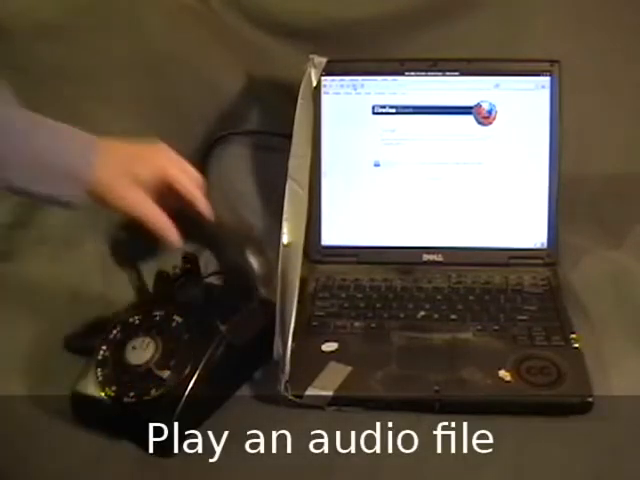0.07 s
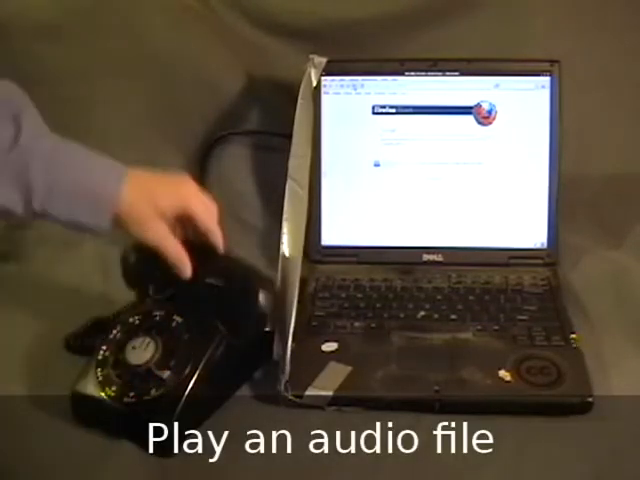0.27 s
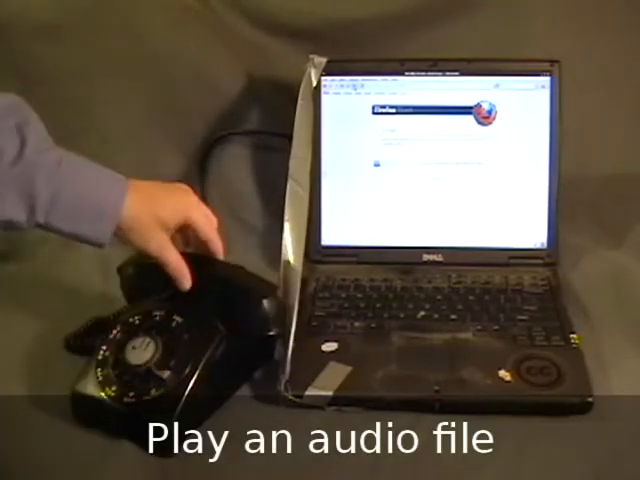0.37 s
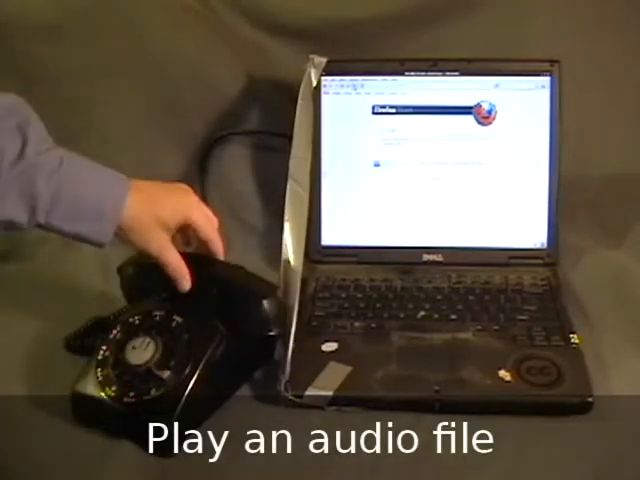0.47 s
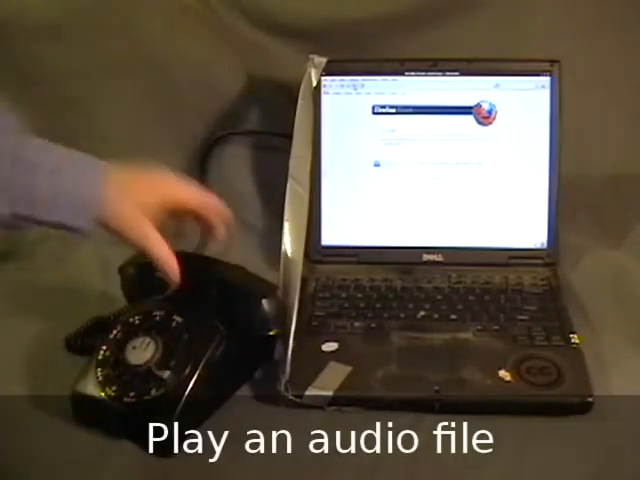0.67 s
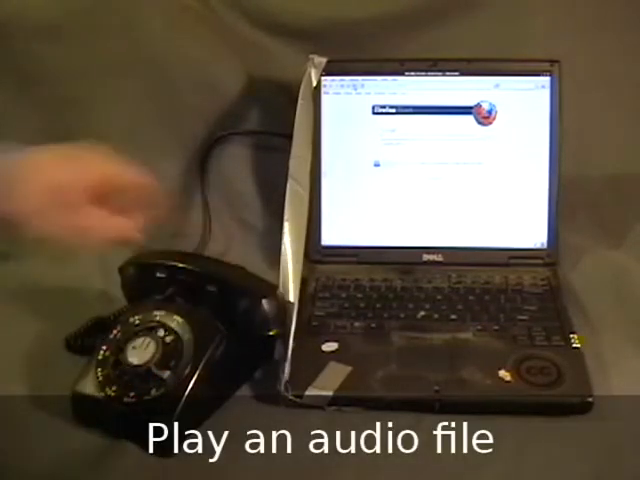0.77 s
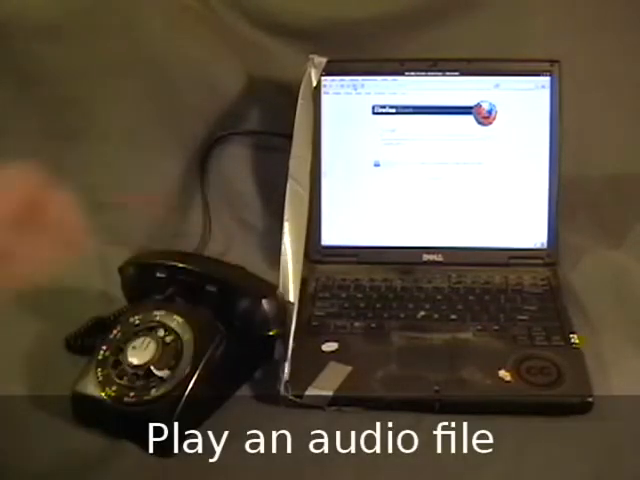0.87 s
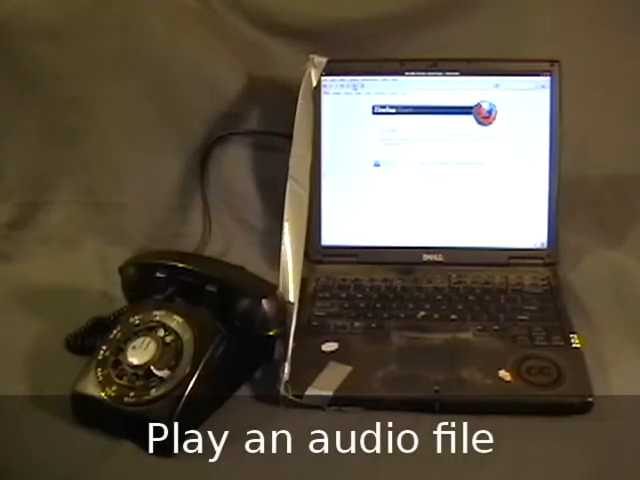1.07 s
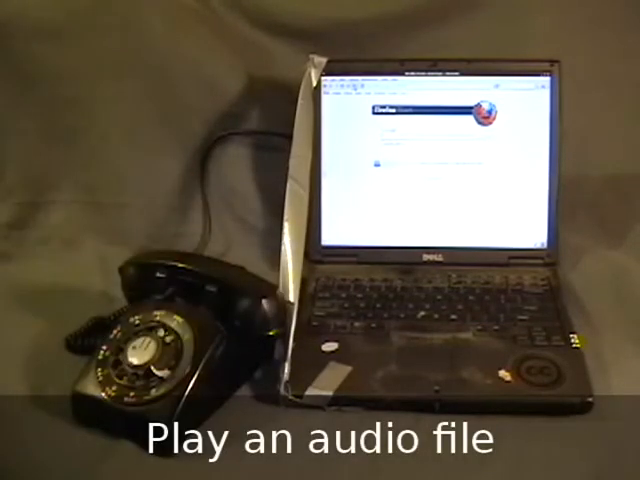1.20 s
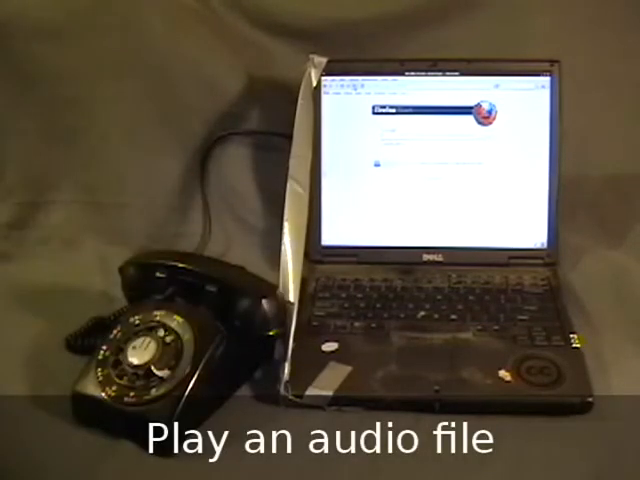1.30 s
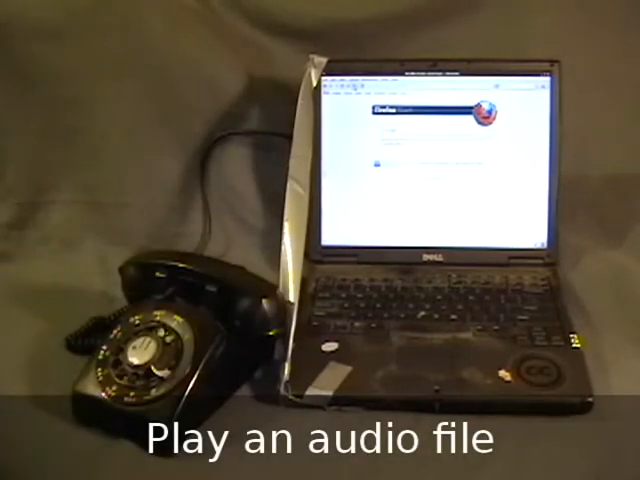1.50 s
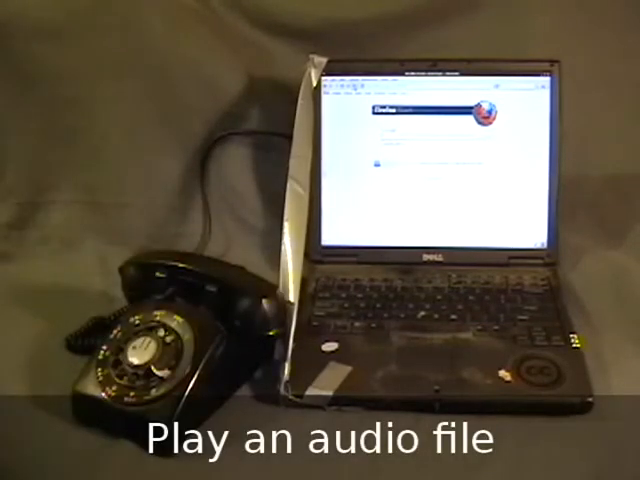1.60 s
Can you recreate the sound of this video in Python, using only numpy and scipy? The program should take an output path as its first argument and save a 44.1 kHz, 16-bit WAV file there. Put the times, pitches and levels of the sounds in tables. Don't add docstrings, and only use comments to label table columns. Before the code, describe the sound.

A heavy plastic telephone handset is hung up, one end clacking and bouncing, plungers ticking, the other end landing with a hollow boom; it settles softly in a quiet room, heard close in stereo.

```python
import sys
import numpy as np
from scipy import signal
from scipy.fft import rfft, irfft, dct
from scipy.io import wavfile
from scipy.ndimage import uniform_filter1d

SR = 44100
rng = np.random.default_rng(int(sys.argv[2]) if len(sys.argv) > 2 else 0)


def level_to_linear(level):
    exponent = np.asarray(level, float) / 20
    return 10 ** exponent


def transcribe(u):
    v = np.clip(np.atleast_2d(u).T, -1, 1)
    q = np.round(v * 32767).astype(np.int16)
    wavfile.write(sys.argv[1], SR, q)


N = 72765


def evened(x):
    return x / np.sqrt(np.mean(x ** 2) + 1e-20)


def read(points, hz):
    f, value = np.transpose(points)
    return np.interp(np.log(hz + 1), np.log(f + 1), value)


def add(mix, s, sound):
    part = mix[round(s * SR):][:len(sound)]
    part += sound[:len(part)]


def coloured(x, points_db):
    gain = level_to_linear(read(points_db, np.fft.rfftfreq(x.shape[-1], 1 / SR)))
    return irfft(rfft(x) * gain, x.shape[-1])


def dying(x, t60s):
    hz, t, z = signal.stft(x, SR, nperseg=128)
    t60 = np.maximum(read(t60s, hz), .005)[:, None]
    return signal.istft(z * level_to_linear(-60 * t / t60), SR, nperseg=128)[1][..., :x.shape[-1]]


# frequency in Hz, level in dB per Hz.
HUSH_COLOUR = [(18, -61), (30, -40), (115, -0.5), (586, -4), (836, -4.5), (1390, -13), (1980, -16.5),
               (10100, -25.5), (13000, -34.5)]
# frequency in Hz, width in Hz, level in dB.
FAN_RESONANCES = [(115.3, 19, -72.5), (423.5, 58, -63.5), (783, 39, -65), (2000, 510, -70.5)]
# frequency in Hz, likeness from -1 to 1.
HUSH_LIKENESS = [(60, 1), (230, -0.54), (880, -0.41), (3360, 0.52), (12900, 0.86)]


def hush():
    frames, hz = N // 256 + 5, np.fft.rfftfreq(1024, 1 / SR)
    a, b, c, d, patches = rng.standard_normal((frames, 513, 5)).T
    patches = uniform_filter1d(patches, size=10, axis=0)
    patches = evened(uniform_filter1d(patches, size=12, axis=1))
    shape = level_to_linear(read(HUSH_COLOUR, hz))
    shape = level_to_linear(-58) * shape / np.linalg.norm(shape)
    for f, width, db in FAN_RESONANCES:
        bump = np.exp(-((hz - f) / width) ** 2)
        shape = np.hypot(shape, level_to_linear(db) * bump / np.linalg.norm(bump))
    same = np.clip(read(HUSH_LIKENESS, hz), -1, 1)[:, None]
    left = a + 1j * b
    right = same * left + np.sqrt(1 - same ** 2) * (c + 1j * d)
    z = np.array([left, right]) * shape[:, None] * level_to_linear(.8 * patches)
    noise = evened(signal.istft(z, nperseg=1024, noverlap=768)[1][:, :N])
    return np.linalg.norm(shape) * level_to_linear([[.2], [-.2]]) * noise


# start in seconds, rise in seconds, fall in seconds, level in dB.
SWISHES = [
    (-.03, 0.056, 0.18, -63),
    (0.913, 0.015, 0.071, -60),
    (0.94, 0.063, 0.13, -57.5),
]
# frequency in Hz, level in dB per Hz.
CLOTH_COLOUR = [(350, -36), (600, -8.5), (921, -10.5), (1610, -5.5), (2170, -12.5), (4780, -13),
                (10500, -17.5), (13300, -21.5)]


def sleeve():
    t = np.arange(N) / SR
    level = np.zeros(N)
    for s, up, down, db in SWISHES:
        ramp = np.minimum((t - s) / up, 1 + (s + up - t) / down)
        level += level_to_linear(db) * np.sin(np.pi / 2 * np.clip(ramp, 0, 1)) ** 2
    grains = rng.standard_normal(N) * level_to_linear(2.5 * np.minimum(rng.exponential(1, N), 3))
    return level * evened(coloured(grains, CLOTH_COLOUR))


# frequency in Hz, t60 in seconds.
RATTLE_FADE = [(200, 0.54), (800, 0.15), (2500, 0.15), (6000, 0.14), (11000, 0.052)]


def strike(modes, colour, rattle_db, contact_ms=0.084, pitch=1, tilt_db=0, fade=RATTLE_FADE):
    t = np.arange(SR // 4) / SR
    ring = np.zeros(len(t))
    for hz, db, t60 in modes:
        t60 = min(t60, 90 / hz)
        level = level_to_linear(db + tilt_db * np.log2(hz / 4000) - 60 * t / t60)
        build_up = 1 - np.exp(-(t * hz / 0.77) ** 2)
        ring += level * build_up * np.sin(2 * np.pi * hz * pitch * t)
    noise = evened(coloured(rng.standard_normal(len(t)), colour))
    crack = 1 + level_to_linear(4) * np.exp(-t / .003)
    rattle = dying(noise, fade) * crack * np.minimum(t * 2000, 1)
    push = t[:256] * np.exp(-t[:256] * 4000 / max(contact_ms, .02))
    return -.4 * signal.oaconvolve(ring + level_to_linear(rattle_db) * rattle, push / push.sum())[:len(t)]


def hits(blows, modes, colour, rattle_db, lag_s=0):
    out = np.zeros(N)
    for s, db, contact_ms in blows:
        add(out, s + lag_s, level_to_linear(db) * strike(modes, colour, rattle_db, contact_ms))
    return out


# start in seconds, level in dB, contact in ms.
FIRST_BLOWS = [
    (0.2025, -6.5, 0.23),
    (0.2095, -22.5, 0.17),
    (.2180, -25, 0.19),
    (0.226, -27, 0.56),
    (0.244, -37, 0.87),
]
# frequency in Hz, level in dB, t60 in seconds.
HANDSET_MODES = [(217.7, -12, 0.15), (397.7, -12.5, 0.25), (507.8, 1.5, 0.094), (649.7, -1.5, 0.084),
                 (747, 5.5, .035), (839, -3.5, 0.057), (1069, -10, 0.058), (1400, 1, 0.03),
                 (1990, -12, 0.044), (2505, -16, 0.05), (3114, -9.5, 0.05), (3287, 1, 0.05),
                 (4950, -0.5, .04), (9200, 2.5, .03)]
# frequency in Hz, level in dB per Hz.
FIRST_RATTLE = [(150, -70), (500, -45), (1000, -25), (2200, -21), (3390, -11), (5760, -19), (7590, -5),
                (9280, -3), (9900, -34), (15000, -94)]


def first_end():
    return hits(FIRST_BLOWS, HANDSET_MODES, FIRST_RATTLE, 6)


# start in seconds, level in dB.
TABLE_THUMPS = [
    (.228, -45.5),
    (0.301, -38),
    (0.327, -40),
]


def table_thumps():
    out = np.zeros(N)
    t = np.arange(SR // 2) / SR
    for s, db in TABLE_THUMPS:
        fading = level_to_linear(db - 60 * t / 0.12)
        add(out, s, fading * np.sin(2 * np.pi * 99 * t) * np.minimum(t * 150, 1))
    return out


# start in seconds, level in dB, pitch factor, tilt in dB per octave, top in Hz.
PLUNGER_TICKS = [
    (0.2306, -20.5, 1.01, 0, 12090),
    (0.2744, -25, 1.01, -.5, 9700),
    (0.4726, -38, 1.3, 0, 9300),
    (0.5057, -39.5, .95, 4, 8800),
]
# frequency in Hz, level in dB, t60 in seconds.
PLUNGER_MODES = [(1903, -22.5, 0.025), (3186, -5.5, 0.015), (3340, 0, 0.03), (4925, 8.5, .04),
                 (6210, -12, 0.025), (7830, -4.5, .03), (8800, -15, 0.03)]
# frequency in Hz, level in dB per Hz.
TICK_RATTLE = [(900, -16), (1900, -2), (2500, -10.5), (3400, -1), (6000, -2), (8300, -1.5), (11000, -6),
               (13000, -49)]
# frequency in Hz, t60 in seconds.
TICK_FADE = [(1000, 0.022), (4000, 0.06), (10000, 0.026)]


def plungers():
    out = np.zeros(N)
    for s, db, pitch, tilt_db, top_hz in PLUNGER_TICKS:
        colour = [point for point in TICK_RATTLE if point[0] < top_hz]
        colour += [(top_hz, -8), (top_hz * 1.06, -50)]
        tick = strike(PLUNGER_MODES, colour, 4.5, pitch=pitch, tilt_db=tilt_db, fade=TICK_FADE)
        add(out, s, level_to_linear(db) * tick)
    return out


# start in seconds, level in dB, contact in ms.
SECOND_BLOWS = [
    (0.3, -8, .2),
    (.3080, -23.5, 0.23),
    (0.316, -35, 0.6),
    (0.3303, -26, 0.56),
    (0.352, -30.5, 1.1),
    (0.370, -29, 3.2),
]
# frequency in Hz, level in dB, t60 in seconds.
BASE_MODES = [(612, -12.5, 0.024), (822, -6, 0.066), (1031, -4, .12), (1165, -22.5, 0.1), (1363, -10, 0.08),
              (1796, -15.5, 0.06), (1940, -4.5, .09), (2072, -4.5, 0.08), (3170, -2.5, 0.04),
              (4250, -11, .06), (6900, -8, 0.035)]
# frequency in Hz, level in dB, t60 in seconds.
BOOM_MODES = [(231, -17.5, .15), (387.5, -2, 0.17), (448.8, 1, 0.18), (518.5, -5, 0.24), (331.4, -19, 0.3),
              (463, -5, 0.035)]
# frequency in Hz, level in dB per Hz.
SECOND_RATTLE = [(88, -65.5), (300, -48.5), (450, -32), (704, -22.5), (1850, -22.5), (5660, -24.5),
                 (8320, -18.5), (9630, -43.5), (12000, -115), (15600, -145), (22000, -120)]


def second_end():
    shell = hits(SECOND_BLOWS, BASE_MODES, SECOND_RATTLE, 1.5)
    return shell + hits(SECOND_BLOWS, BOOM_MODES, SECOND_RATTLE, -32, lag_s=0.0019)


# start in seconds, fade start in seconds, end in seconds, level in dB.
SEAT_SCRAPE = (.473, .52, .60, -52)
# frequency in Hz, level in dB per Hz.
SEAT_COLOUR = [(400, -24), (760, 4.5), (930, -6.5), (1100, -5.5), (1400, -7.5), (1850, -0.5), (3300, -10),
               (10000, -24)]


def scrape():
    t = np.arange(N) / SR
    start, fade, end, db = SEAT_SCRAPE
    level = level_to_linear(db) * (t > start) * np.clip((end - t) / (end - fade), 0, 1) ** 2
    grains = rng.standard_normal(N) * level_to_linear(3.5 * rng.exponential(1, N))
    return level * evened(coloured(grains, SEAT_COLOUR))


# start in seconds, level in dB, contact in ms.
SETTLE_TOUCHES = [
    (0.484, -38.5, 0.5),
    (.5190, -51.5, 0.41),
    (0.5267, -35, 1.3),
    (.5310, -30.5, 0.86),
    (.5460, -47, 0.23),
    (0.559, -47, 0.41),
    (0.573, -48.5, 0.26),
    (.595, -47.5, 0.39),
]
# frequency in Hz, level in dB, t60 in seconds.
SEATED_MODES = [(236, 3.5, 0.052), (396.7, 2, 0.13), (460, 5, 0.082), (496, -4, 0.14), (771.5, 0.5, 0.06),
                (1020, -33, 0.13), (1850, -6.5, .05)]


def settling():
    return hits(SETTLE_TOUCHES, SEATED_MODES, SECOND_RATTLE, 4.6)


# start in seconds, level in dB, contact in ms.
CORD_TAPS = [
    (0.9265, -46.5, 0.38),
    (.9350, -53, 0.41),
    (0.9522, -55, 0.15),
    (1.0, -58, 0.14),
    (1.0520, -57, 0.22),
]
# frequency in Hz, level in dB, t60 in seconds.
CORD_RINGING = [(243, -3, 0.18), (433, 7, 0.072), (668, 5, 0.12), (1058, -9, 0.092), (1624, 2, 0.066),
                (2190, 3, 0.028), (3660, -12, 0.024)]


def cord_taps():
    return hits(CORD_TAPS, CORD_RINGING, SECOND_RATTLE, 4.2)


# start in seconds, frequency in Hz, length in seconds, level in dB.
CORD_SQUEAK = (.97, 1630, .07, -62)


def cord_squeak():
    t = np.arange(N) / SR
    s, hz, length, db = CORD_SQUEAK
    band = [(hz * 1.2, -40), (hz, 0), (hz * 1.12, -40)]
    fuzz = evened(coloured(rng.standard_normal(N), band))
    return level_to_linear(db) * np.sin(np.pi * np.clip((t - s) / length, 0, 1)) ** 2 * fuzz


def phone():
    small = plungers() + scrape() + settling() + cord_taps() + cord_squeak()
    out = np.array([first_end(), second_end(), small])
    high_pass = signal.butter(N=6, Wn=169.2, btype="high", fs=SR, output="sos")
    out = signal.sosfilt(high_pass, out)
    out[1] += table_thumps()
    return out


# frequency in Hz, t60 in seconds.
ROOM_FADE = [(150, .25), (450, .25), (1500, .3), (9000, .2)]


def room(x):
    taps = np.zeros((3, SR))
    at = np.arange(200, SR - 20, 20) + rng.integers(0, 20, (3, (SR - 201) // 20))
    np.put_along_axis(taps, at, rng.choice([-1., 1.], at.shape), 1)
    same = 0.92
    tail = dying(np.sqrt(same) * taps[2] + np.sqrt(1 - same) * taps[:2], ROOM_FADE)
    return signal.fftconvolve(x[None], tail / np.linalg.norm(tail[0]), axes=1)[:, :N]


# frequency in Hz, left minus right in dB.
LEFT_LEAN = [(200, -3.5), (450, -2.5), (1000, .5), (2000, .7), (5000, .5), (10000, 1.5)]


def scene():
    near = np.vstack([phone(), sleeve()])
    pan_db = np.array([3.5, 3.5, 4, 4.5])
    sides = []
    for side in (1, -1):
        lean = [(f, side * db / 2) for f, db in LEFT_LEAN]
        sides.append(coloured(level_to_linear(side * pan_db / 2) @ near, lean))
    return np.array(sides) + level_to_linear(-13.5) * room(near.sum(0)) + hush()


# frequency in Hz, level in dB.
QUIET_LIMIT = [(4500, -98), (5800, -64.5), (7000, -62.5), (10000, -66.5), (11500, -62.5), (13500, -73)]
# frequency in Hz, step in dB.
ROUNDING_STEP = [(150, -27), (500, -14), (2000, -4.5), (9000, -1)]


def camera_smear(x):
    hop, first, band_bins = 1412, 560, 16
    k, blocks = np.arange(hop), N // hop + 3
    lead = 2 * hop - first
    rise = np.sin(np.pi / 2 * np.sin(np.pi / 2 * (k + .5) / hop) ** 2)
    window = np.r_[rise, rise[::-1]]
    turn = np.array([[1, 1], [1, -1]]) / np.sqrt(2)
    at = np.arange(blocks)[:, None] * hop + np.arange(2 * hop)
    padded = np.pad(turn @ x, ((0, 0), (lead, 3 * hop)))
    a, b, c, d = np.split(padded[:, at] * window, 4, axis=2)
    z = dct(np.dstack([-c[..., ::-1] - d, a - b[..., ::-1]]), type=4, norm="ortho")
    sag = 8.5 * np.arange(blocks)
    block_db = 10 * np.log10(np.mean(z ** 2, (0, 2)) + 1e-12)
    held_db = np.maximum.accumulate(block_db + sag) - sag
    band, hz = k // band_bins, k * SR / 2 / hop
    limit_db = read(QUIET_LIMIT, hz) + 0.71 * np.maximum(held_db + 57.5, 0)[:, None]
    limit_db = limit_db + 3 * rng.standard_normal((blocks, hop))[:, band]
    level = np.sqrt(np.add.reduceat(z ** 2, k[::band_bins], axis=2) / band_bins)[..., band]
    step = level_to_linear(read(ROUNDING_STEP, hz)) * level[0] + 1e-9
    rounded = np.sign(z) * np.floor(abs(z) / step + 0.35) * step
    rounded = rounded * (level[0] > level_to_linear(limit_db))
    u, v = np.split(dct(rounded, type=4, norm="ortho"), 2, axis=2)
    pieces = np.dstack([v, -v[..., ::-1], -u[..., ::-1], -u]) * window
    out = np.zeros((2, (blocks + 1) * hop))
    out[:, :-hop] += pieces[..., :hop].reshape(2, -1)
    out[:, hop:] += pieces[..., hop:].reshape(2, -1)
    return turn @ out[:, lead:][:, :N]


def roll_off(x):
    return signal.sosfilt(signal.butter(12, 13470, fs=SR, output="sos"), x)


def record(dry):
    heard = coloured(dry, [(9000, 1), (11000, 3.5), (13500, -5.5)])
    finished = camera_smear(heard)
    return roll_off(finished)


dry = scene()
out = record(dry)
transcribe(out)
```